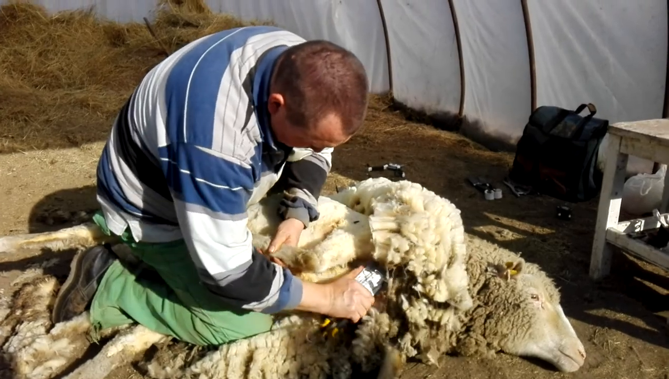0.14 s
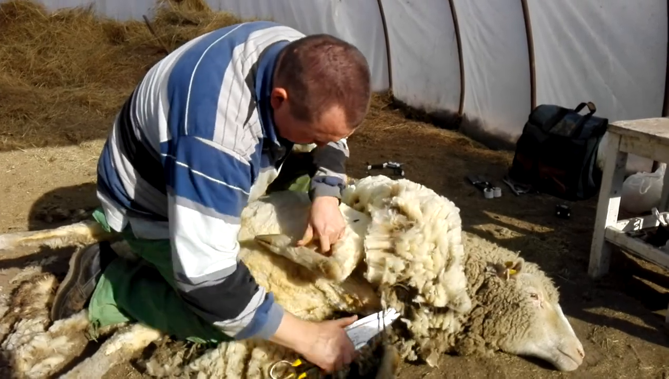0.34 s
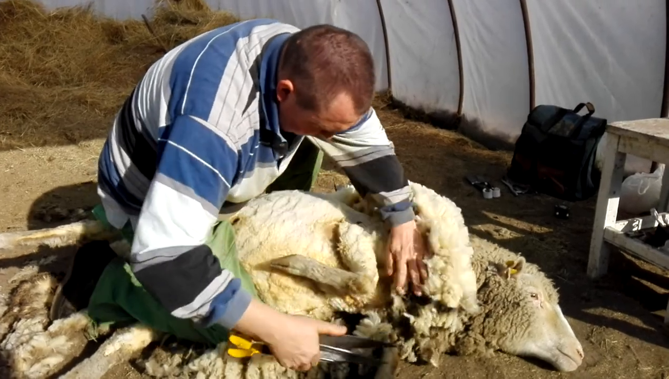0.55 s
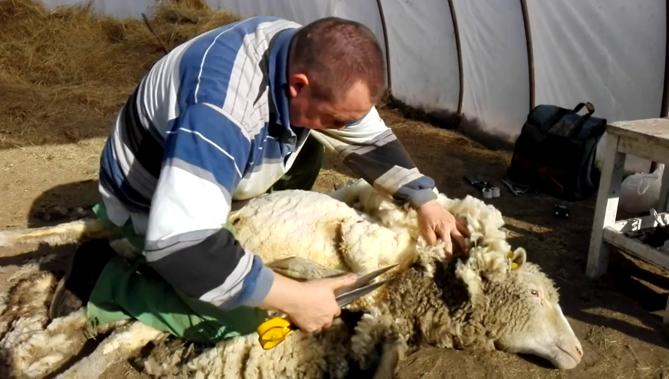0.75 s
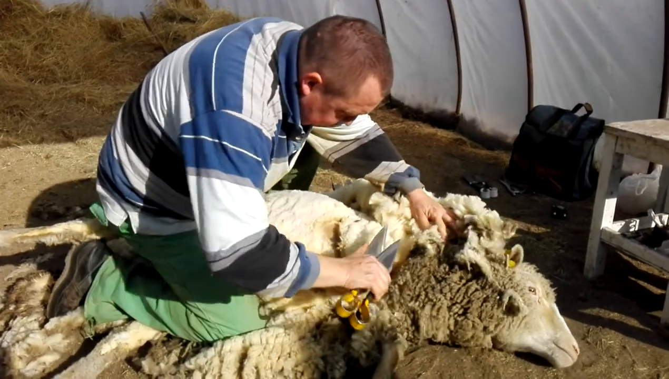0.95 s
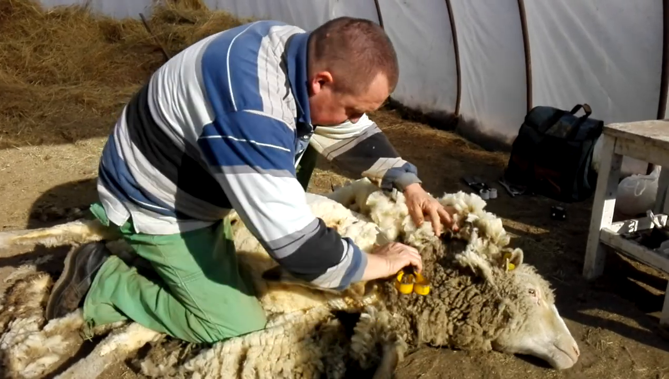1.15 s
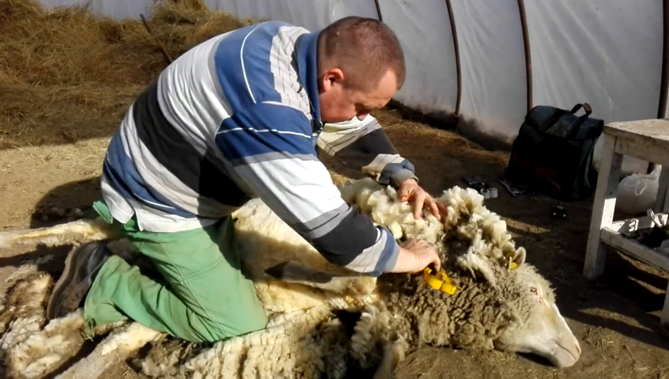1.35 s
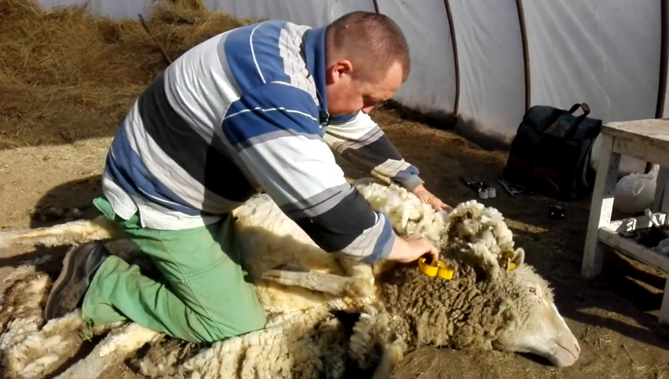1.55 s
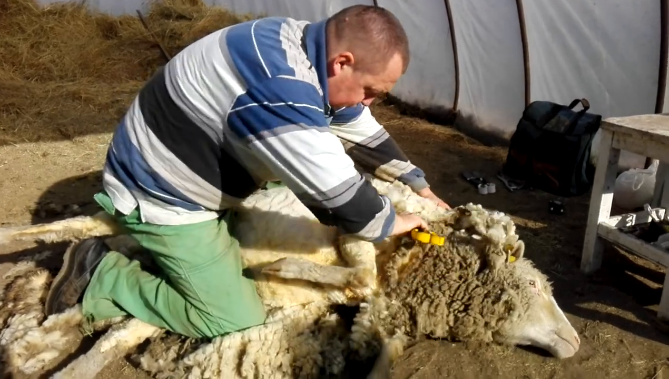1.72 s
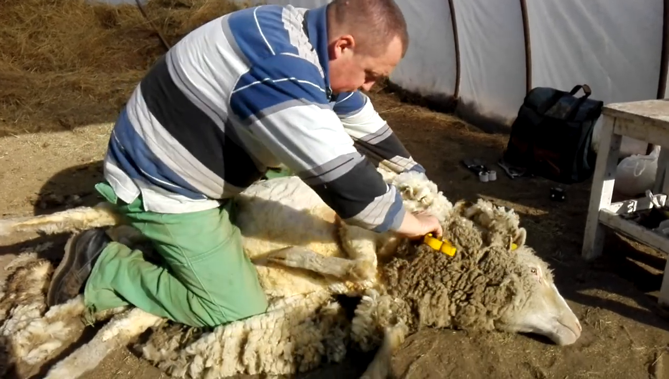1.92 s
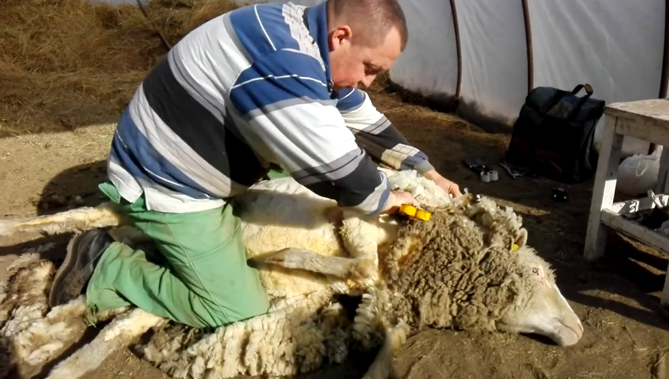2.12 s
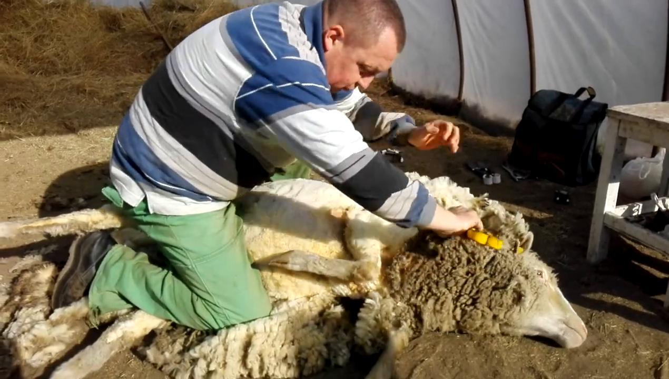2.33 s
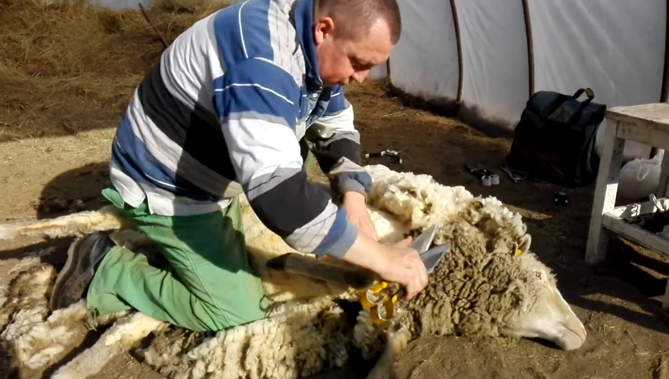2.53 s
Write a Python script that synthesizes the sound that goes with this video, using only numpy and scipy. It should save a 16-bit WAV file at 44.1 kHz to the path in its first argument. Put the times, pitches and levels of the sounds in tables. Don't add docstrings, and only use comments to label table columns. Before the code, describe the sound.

Hand blade shears cut fleece close to the microphone: gritty grinding strokes end in four bright metallic snaps, with scraping reopenings, faint wool whistles in a pause, and low wind bumps over a faint hum.

```python
import sys
import numpy as np
from scipy import signal
from scipy.fft import rfft, irfft
from scipy.io import wavfile
from scipy.ndimage import uniform_filter1d, minimum_filter1d

SR = 44100
rng = np.random.default_rng(int(sys.argv[2]) if len(sys.argv) > 2 else 0)


def gain_from_db(level_db):
    decades = np.asarray(level_db, float) / 20
    return 10 ** decades


def pcm_store(signal):
    levels = np.round(np.clip(np.atleast_2d(signal), -1, 1) * 32767)
    wavfile.write(sys.argv[1], SR, levels.astype(np.int16).T)


N = 112455

# (frequency [Hz], width [Hz], struck level [dB], scraped level [dB])
BLADE_MODES = [(2610, 41, -14, -11.5), (3344, 48, -14.5, -7), (3860, 40, -19.5, -5.5),
               (4513, 64, 1.5, -0.5), (4700, 75, -3.5, 1), (5470, 110, -0.5, -9.5), (5335, 92, 0.5, -12),
               (5710, 88, 2, -10), (6000, 81, -8.5, -0.5), (6684, 110, 6, -10), (7320, 59, -7, -14.5),
               (8580, 190, -4.5, -5), (9830, 110, -5.5, -14.5), (14150, 150, -12.5, -15.5)]


def evened(x):
    return x / np.sqrt(np.mean(x ** 2) + 1e-20)


def shaped(x, points, tilt_db=0):
    hz, db = np.transpose(points)
    octave = np.log2(np.fft.rfftfreq(len(x), 1 / SR) + 1)
    colour_db = np.interp(octave, np.log2(hz), db, left=-70)
    colour_db = colour_db + tilt_db * (octave - np.log2(6000))
    return irfft(rfft(x) * gain_from_db(colour_db), len(x))


def resonate(x, hz, width_hz):
    turn = np.exp(2j * np.pi * np.cumsum(hz * np.ones(len(x))) / SR)
    r = np.exp(-np.pi * width_hz / SR)
    return 2 * (turn * signal.lfilter([1 - r], [1, -r], x / turn)).real


def wander(size):
    return evened(uniform_filter1d(uniform_filter1d(rng.standard_normal(N), size), size))


def add(mix, start_s, sound):
    part = mix[round(start_s * SR):][:len(sound)]
    part += sound[:len(part)]


def strokes():
    # (full pressure [s], rise [s], hold [s], fall [s], level [dB])
    stroke_rows = [(.13, 0.035, 0.043, 0.018, -68.5), (.185, 0.048, 0.064, 0.015, -43),
                   (.229, .006, 0.0079, .01, -37.5), (.376, 0.0091, 0.013, 0.03, -39.5),
                   (.39, 0.015, 0.039, 0.074, -46), (.3, .02, 0.086, .02, -69), (1.1, .03, 0.16, .05, -77),
                   (1.31, 0.074, 0.064, 0.025, -58.5), (1.355, 0.071, 0.14, 0.025, -51),
                   (1.385, 0.0069, 0.079, .02, -43.5), (1.529, 0.015, 0.024, 0.024, -38.5),
                   (1.56, 0.025, 0.032, 0.059, -49.5), (1.62, .03, 0.11, .04, -74),
                   (1.775, 0.0288, 0.066, 0.037, -70.5), (1.83, 0.019, 0.036, 0.033, -50),
                   (1.865, 0.04, 0.056, 0.016, -40), (1.965, 0.011, 0.035, 0.092, -40),
                   (2.13, 0.31, 0.028, .04, -73.5), (2.21, 0.052, 0.0565, 0.032, -61.5),
                   (2.266, 0.021, 0.024, .02, -35.5), (2.34, 0.022, 0.083, .02, -61.5),
                   (2.413, 0.021, 0.057, 0.043, -44.5)]
    # (frequency [Hz], density [dB/Hz])
    grind_colour = [(710, -64), (2100, -28.5), (2900, -13.5), (4920, -4), (7080, -15), (8580, -14.5),
                    (11200, -25.5), (13600, -18), (14600, -27.5)]
    # (start [s], length [s], frequency [Hz], level [dB])
    songs = [(.125, .05, 5700, -66), (.175, .055, 5750, -52), (.18, .05, 4700, -52),
             (.373, .018, 5850, -48), (.374, .058, 8600, -55), (.374, .03, 4720, -47),
             (.374, .035, 9750, -62), (.405, .045, 3750, -57), (1.35, .065, 4520, -51),
             (1.385, .03, 8300, -55), (1.526, .018, 5870, -48), (1.535, .05, 3860, -49),
             (1.6, .05, 4500, -68), (1.757, .07, 5800, -63), (1.78, .1, 4550, -60), (1.79, .07, 8450, -67),
             (1.82, .065, 5800, -52), (1.82, .06, 13200, -67), (1.963, .05, 5070, -49),
             (1.985, .045, 3780, -55), (2.1, .1, 8500, -80), (2.185, .07, 4600, -64),
             (2.19, .07, 5800, -69), (2.415, .05, 4540, -53), (2.43, .035, 6720, -56)]
    # (start [s], length [s], level [dB], frequency [Hz])
    bow_hums = [
        (.236, .1, -52, 1615),
        (.42, .18, -72, 1620),
        (1.417, .045, -46, 1600),
        (1.532, .05, -72, 1560),
        (1.965, .06, -68, 1830),
        (1.82, .03, -68, 1860),
    ]
    grit_db, sing_db, light_sing = 0, -4, 0.85

    grit = rng.standard_normal(N) * gain_from_db(grit_db * wander(size=60))
    press = pressure(stroke_rows)
    grind = evened(patchy(shaped(grit, grind_colour), streak_db=4))
    sing_gain = gain_from_db(sing_db) * (press / 0.03) ** light_sing * 0.0081
    both = press * grind + sing_gain * singing(grit)
    broken = gain_from_db(2.5 * wander(size=120))
    for start_s, length_s, hz, db in songs:
        add(both, start_s, glide(broken, start_s, length_s, hz, hz, db, width_hz=150))
    for start_s, length_s, db, hz in bow_hums:
        u = np.arange(0, length_s, 1 / SR) / length_s
        phase = np.cumsum(2 * np.pi * hz / SR + .015 * rng.standard_normal(len(u)))
        swell = np.minimum(u * 20, 1) * (1 - u) ** 2
        add(both, start_s, gain_from_db(db) * swell * 2 * np.sin(phase))
    return both


def pressure(rows):
    edge_db, sag_db = -39, -6
    t, out = np.arange(N) / SR, np.zeros(N)
    for full_s, rise_s, hold_s, fall_s, db in rows:
        corners_s = np.cumsum([full_s - 2 * rise_s, rise_s, rise_s, hold_s, fall_s, fall_s])
        out += gain_from_db(db + np.interp(t, corners_s, [-99, edge_db, 0, sag_db, sag_db + edge_db, -120]))
    return out


def patchy(x, streak_db):
    z = signal.stft(x, nperseg=256)[2]
    streaks = uniform_filter1d(rng.standard_normal(z.shape), size=3, axis=0)
    streaks = uniform_filter1d(streaks, size=9, axis=1)
    return signal.istft(z * gain_from_db(streak_db * evened(streaks)), nperseg=256)[1][:len(x)]


def singing(drive):
    n, waver_db = len(drive), 4
    total = np.zeros(n)
    for hz, width_hz, _, db in BLADE_MODES:
        level = gain_from_db(db + waver_db * wander(size=450)[:n])
        drifting_hz = hz * (1 + .012 * wander(size=900)[:n])
        mode = resonate(resonate(drive, drifting_hz, 2 * width_hz), hz, 4 * width_hz)
        total += level * evened(mode)
    return evened(total)


def glide(broken, start_s, length_s, from_hz, to_hz, db, width_hz):
    clear = .8
    u = np.arange(0, length_s, 1 / SR) / length_s
    hz = from_hz + (to_hz - from_hz) * np.sin(np.pi * u / 2) ** 2
    fuzz = resonate(resonate(rng.standard_normal(len(u)), hz, width_hz), hz, width_hz)
    tone = evened(fuzz) + clear * np.sin(2 * np.pi * np.cumsum(hz) / SR)
    return gain_from_db(db) * evened(tone) * np.sin(np.pi * u) ** .5 * broken[round(start_s * SR):][:len(u)]


def snap(s, db, ground_db, wall_db, tilt_db, ground_s, wall_s, thud_db, thud_hz, damp_hz, linger):
    # (frequency [Hz], density [dB/Hz])
    crack_colour = [(180, -62), (300, -43.5), (1930, -17), (2780, -8.5), (5370, -5.5), (9570, -8.5),
                    (10700, -20.5), (13800, -15.5), (15400, -38.5)]
    crack_t60_s, ring_db = 0.019, -6
    tail_t60_s, tail_db = 0.14, -18
    linger_t60_s, linger_db = .3, -35

    t = np.arange(SR // 2) / SR
    out = np.zeros(len(t))
    for delay_s, gain_db, rise_s in ((0, 0, .0006), (ground_s, ground_db, .0016), (wall_s, wall_db, .002)):
        crack = evened(shaped(rng.standard_normal(len(t)), crack_colour, tilt_db))
        crack *= gain_from_db(-60 * t / crack_t60_s)
        ring = np.zeros(len(t))
        for hz, width_hz, struck_db, _ in BLADE_MODES:
            level_luck, phase_luck = rng.standard_normal(2)
            decay = np.exp(-np.pi * 1.5 * width_hz * t)
            ring += gain_from_db(struck_db + 2 * level_luck) * decay * np.sin(2 * np.pi * hz * t + 0.35 * phase_luck)
        onset = np.sin(np.pi / 2 * np.minimum(t / rise_s, 1)) ** 2
        add(out, delay_s, gain_from_db(gain_db) * (crack + gain_from_db(ring_db) * ring) * onset)

    tail = evened(patchy(shaped(rng.standard_normal(len(t)), crack_colour, tilt_db - 1.8), streak_db=4))
    tail *= gain_from_db(tail_db - 60 * t / tail_t60_s)
    tail += linger[round(s * SR / 2):][:len(t)] * gain_from_db(linger_db - 60 * t / linger_t60_s)
    wool_damping = signal.butter(2, damp_hz, "high", fs=SR, output="sos")
    damped = signal.sosfilt(wool_damping, out + np.minimum(t / .005, 1) * tail)
    thud = gain_from_db(thud_db - 60 * t / 0.088) * evened(resonate(rng.standard_normal(len(t)), thud_hz, 570))
    return gain_from_db(db) * (damped + np.minimum(t / 0.0018, 1) * thud)


def wool():
    # (full [s], rise [s], hold [s], fall [s], level [dB])
    rustles = [(.47, 0.069, 0.033, .06, -68), (.82, 0.1, 0.12, 0.034, -74), (.93, 0.076, 0.017, 0.2, -62),
               (1.0, 0.043, .04, 0.049, -85.5), (1.118, 0.026, 0.035, 0.045, -55),
               (1.28, 0.06, 0.075, 0.062, -68.5), (1.085, 0.02, 0.033, 0.05, -65),
               (1.17, 0.044, 0.096, 0.06, -63.5), (1.62, 0.047, 0.036, 0.14, -67),
               (2.062, 0.008, 0.036, 0.041, -55.5), (2.188, 0.011, 0.025, 0.03, -62)]
    # (frequency [Hz], density [dB/Hz])
    rustle_colour = [(2000, -37.5), (2700, -13.5), (3500, 0.5), (4700, 7), (5400, -1.5), (5900, -19),
                     (8000, -35), (14000, -33)]
    # (start [s], length [s], from [Hz], to [Hz], level [dB])
    whistles = [(.785, .025, 6750, 6700, -78), (.806, .026, 6250, 6150, -71), (.81, .06, 1650, 1850, -79),
                (.82, .025, 5300, 5200, -75), (.826, .022, 5950, 5800, -71), (.841, .022, 5800, 4800, -72),
                (.857, .043, 4800, 4600, -72), (.891, .03, 4650, 3000, -70), (.915, .055, 3600, 3200, -70),
                (.918, .03, 4500, 4550, -66), (.92, .02, 5800, 5750, -76), (.93, .025, 2600, 2550, -75),
                (.96, .085, 3350, 3400, -75), (1.045, .045, 3800, 4900, -69), (1.07, .03, 2650, 2700, -75),
                (1.075, .055, 4950, 4750, -62), (1.075, .025, 3800, 3950, -65),
                (1.086, .03, 2700, 4600, -62), (1.097, .028, 2900, 4900, -62),
                (1.105, .03, 3500, 3600, -64), (1.11, .13, 7350, 7550, -82), (1.12, .06, 8400, 8600, -83),
                (1.125, .035, 2950, 3600, -72), (1.14, .07, 4700, 5300, -69), (1.165, .06, 3900, 4300, -71),
                (1.195, .1, 5250, 5300, -67)]

    rustle = evened(patchy(shaped(rng.standard_normal(N), rustle_colour), streak_db=1))
    out = rustle * pressure(rustles)
    broken = gain_from_db(2 * wander(size=150))
    for start_s, length_s, from_hz, to_hz, db in whistles:
        add(out, start_s, glide(broken, start_s, length_s, from_hz, to_hz, db, width_hz=200))
    return out


def wind():
    # (time [s], level [dB])
    gusts = [(0.0, -40), (0.15, -49), (0.37, -66.5), (0.44, -40), (0.71, -76.5), (0.77, -50.5), (0.82, -67),
             (0.86, -51.5), (1.05, -70.5), (1.16, -57), (1.45, -70.5), (1.5, -59.5), (2.0, -66),
             (2.06, -48.5), (2.11, -59.5), (2.17, -44), (2.36, -67), (2.55, -71)]
    # (frequency [Hz], density [dB/Hz])
    wind_colour = [(12, -32.5), (20, -1.5), (48, 3.5), (86, -8), (114, -10), (264, -37), (400, -63),
                   (520, -86), (880, -120)]
    # (start [s], frequency [Hz], peak level [dB])
    bumps = [
        (0.126, 142, -32),
        (0.43, 72, -46.5),
        (0.5, 88, -37.5),
    ]
    gust_db = 2.5

    lumps = gain_from_db(np.interp(np.arange(N) / SR, *np.transpose(gusts)))
    lumps = lumps * evened(gain_from_db(gust_db * wander(size=700)))
    out = evened(shaped(rng.standard_normal(N), wind_colour + [(800, -70.5)])) * lumps
    for start_s, hz, db in bumps:
        cycles = np.arange(0, 4, hz / SR)
        swell = np.sin(np.pi * (cycles / 4) ** .5) ** 2
        add(out, start_s, gain_from_db(db) * swell * np.sin(2 * np.pi * cycles ** 0.7))
    return out


def hum():
    # (frequency [Hz], density [dB/Hz])
    hum_colour = [(100, -35), (170, -1.5), (250, -2.5), (450, -18.5), (1300, -6), (2670, -16),
                  (5000, -15.5), (13200, -25), (15000, -35)]
    # (time [s], level [dB])
    hum_swell = [(0, 2.5), (0.448, 4), (1.201, 3), (2.55, 2.5)]
    hum_db = -76
    swell_db = np.interp(np.arange(N) / SR, *np.transpose(hum_swell)) + 1.7 * wander(size=2000)
    return gain_from_db(hum_db) * evened(shaped(rng.standard_normal(N), hum_colour)) * gain_from_db(swell_db)


def scene():
    # (time [s], level [dB], ground echo [dB], wall echo [dB], brightness [dB/octave])
    snaps = [
        (0.2345, -3.5, -4, -14, 2.94),
        (1.4163, -6, -10, -12.5, 2),
        (1.8881, -10, -2.5, -10, 0.1),
        (2.2858, -5, -2.5, -12.5, 0.45),
    ]
    # (ground echo delay [s], wall echo delay [s], thud level [dB], thud [Hz],
    # wool damps the crack below [Hz])
    grips = [(.0067, 0.011, -39.5, 580, 940), (.0062, 0.0084, -44.5, 600, 770),
             (.0058, .011, -43.5, 300, 1440), (0.0049, 0.01, -38, 550, 2100)]
    # (frequency [Hz], gain [dB])
    side_colour = [(200, -39.5), (400, -12.5), (800, -45), (3000, -37.5), (5000, -20), (8000, 4),
                   (11000, 3), (14000, -10.5)]
    side_db = -22.5

    shears = strokes() + wool()
    linger = singing(rng.standard_normal(N))
    for row, grip in zip(snaps, grips):
        add(shears, row[0], snap(*row, *grip, linger))
    spread = signal.oaconvolve(shears, evened(rng.standard_normal(64)) / 8)[:N]
    side = gain_from_db(side_db) * shaped(spread, side_colour)
    mid = shears + wind() + hum()
    return np.array([mid + side, mid - side])


def top_cut(x):
    return signal.sosfilt(signal.butter(12, 15590, fs=SR, output="sos"), x)


def record(dry):
    top_hz, open_db, ceiling = 14400, -18.5, 1.02
    dry = signal.oaconvolve(dry, signal.firwin(63, 15400, fs=SR)[None], "same")
    steep = signal.firwin(255, top_hz, window=("kaiser", 8), fs=SR)
    dull = signal.oaconvolve(dry, steep[None], "same")
    level = uniform_filter1d(abs(dry).mean(0), size=200)
    wide = dull + np.clip(level / gain_from_db(open_db), 0, 1) ** 4 * (dry - dull)
    gain = minimum_filter1d(ceiling / np.maximum(abs(wide).max(0), ceiling), size=81)
    gain = uniform_filter1d(uniform_filter1d(gain, size=40), size=40)
    return top_cut(wide * gain)


dry = scene()
out = record(dry)
pcm_store(out)
```